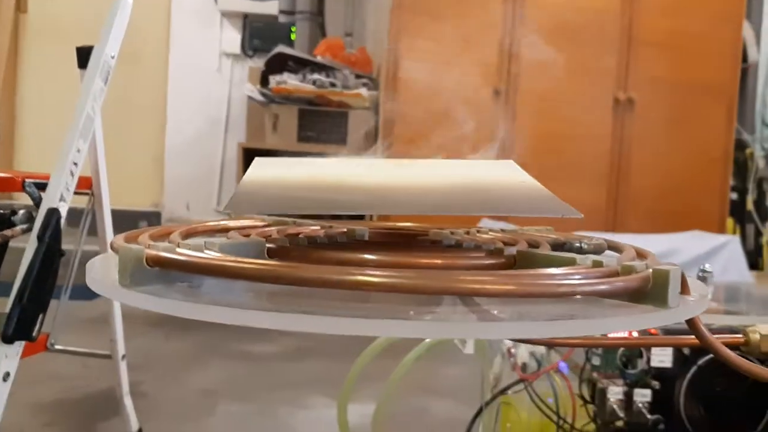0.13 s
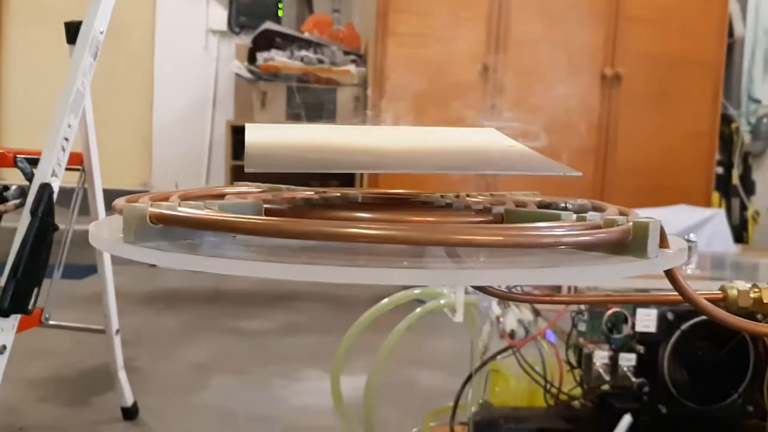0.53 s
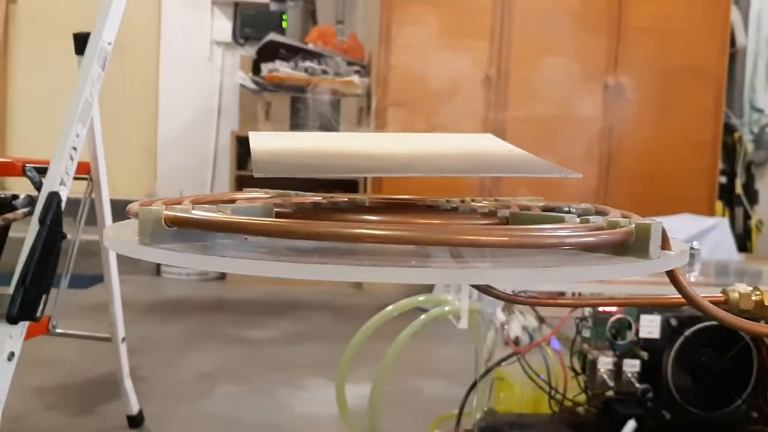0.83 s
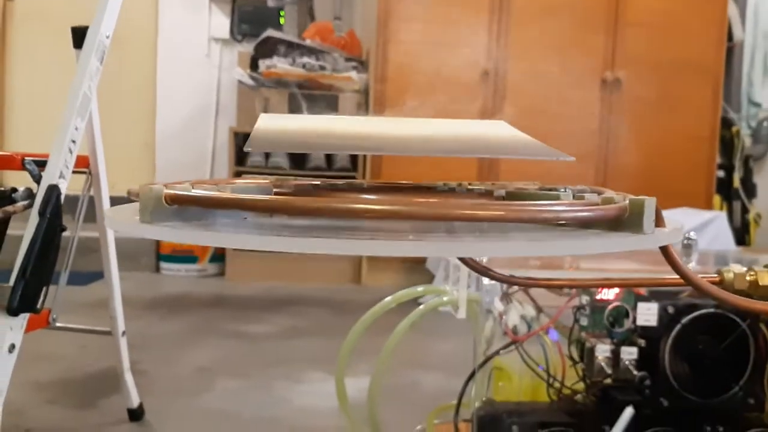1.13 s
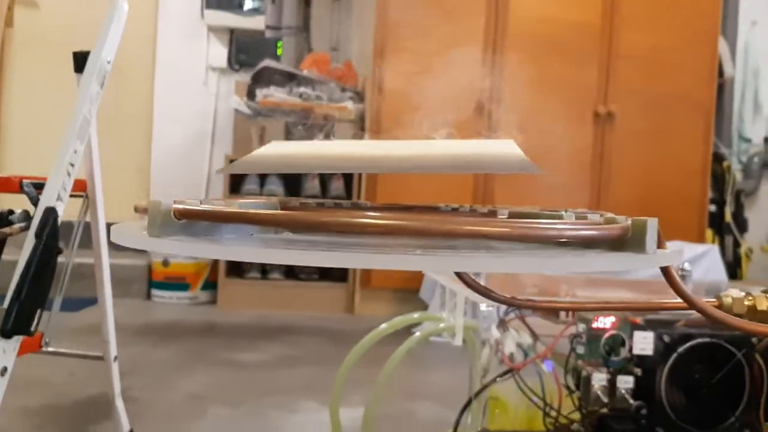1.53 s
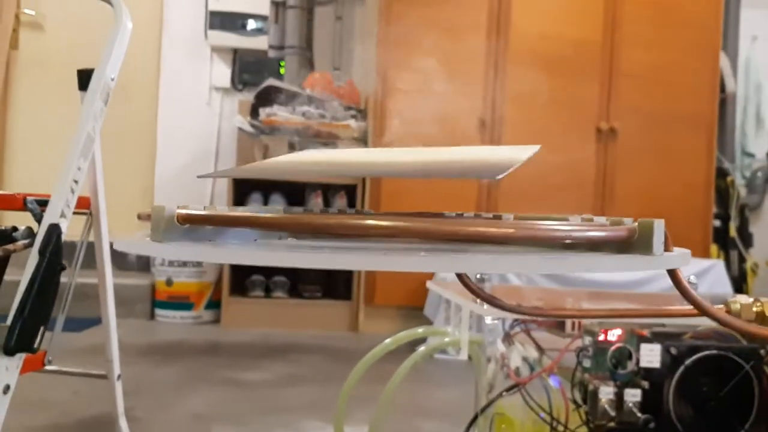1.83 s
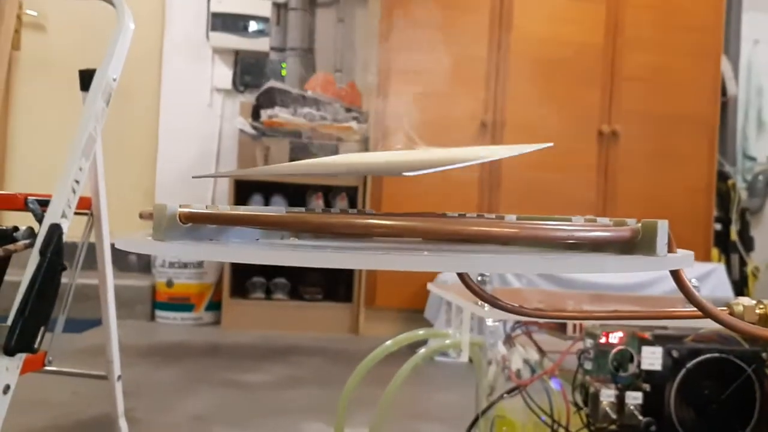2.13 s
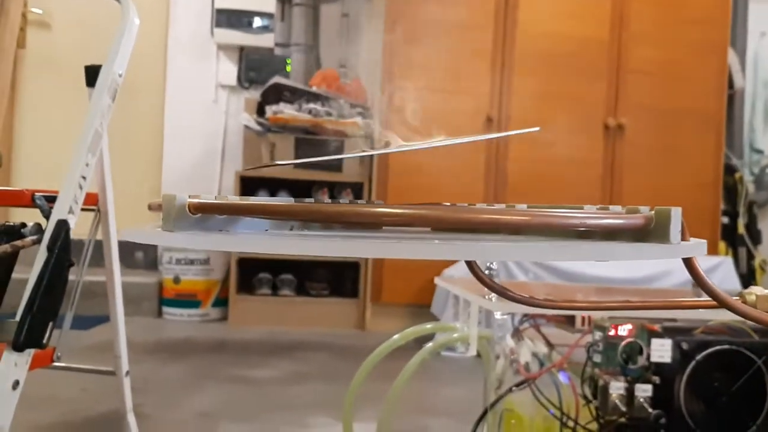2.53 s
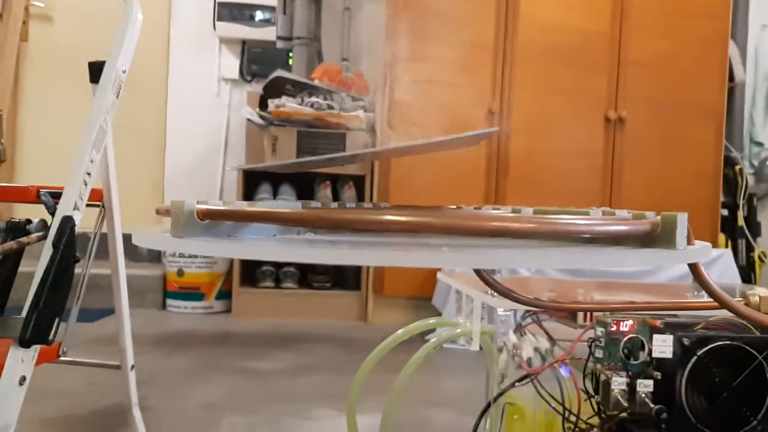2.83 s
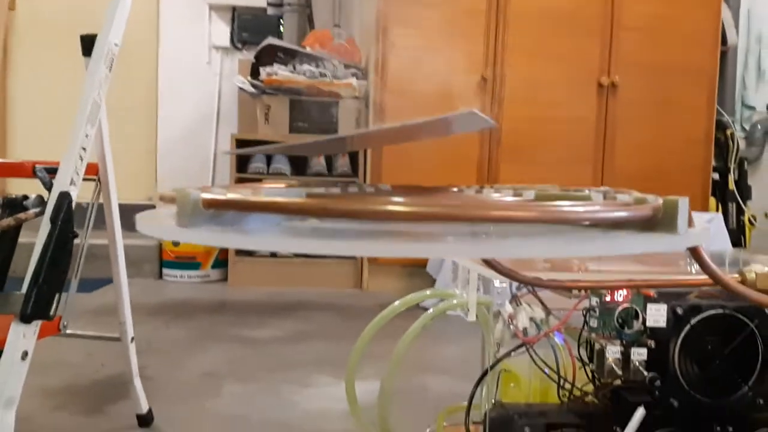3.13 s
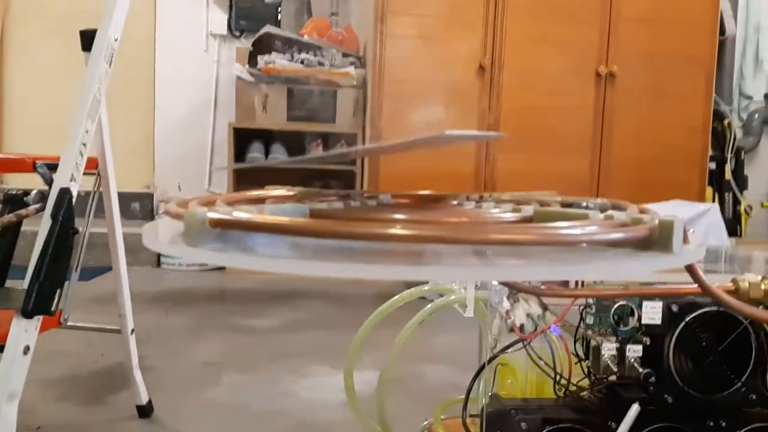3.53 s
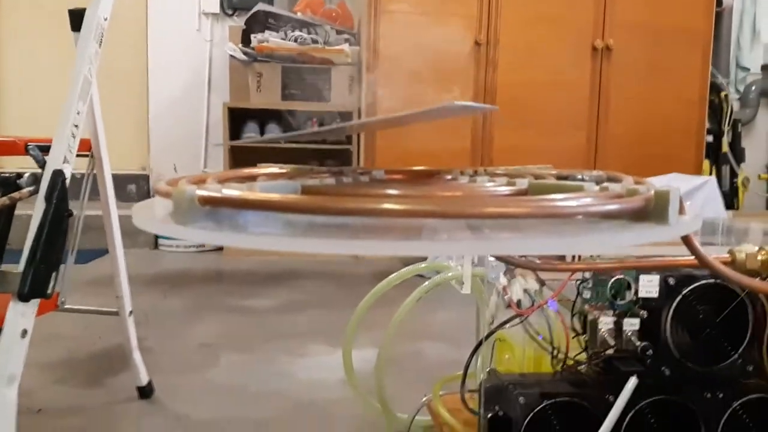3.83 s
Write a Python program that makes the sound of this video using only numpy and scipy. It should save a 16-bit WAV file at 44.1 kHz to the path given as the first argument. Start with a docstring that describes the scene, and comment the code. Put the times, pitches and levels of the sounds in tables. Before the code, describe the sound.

Steady rushing air from equipment fans, strongest in the upper mids with little deep bass, over a softly fluttering hum and faint wavering whine; close handheld phone microphones in a workshop, no beginning or end.

```python
"""Cooling fans of a power supply run steadily in a workshop, heard from about a metre by a handheld phone.
Throughout, air rushes through grilles and fins as shaped noise and stays nearly even; housing and room ring
as narrow noise bands, a hum that flutters irregularly in level, as noise does; faint blade and motor tones
are wavering sines. The two microphone ports hear the treble late and unlike."""
import sys
import numpy as np
from scipy import signal
from scipy.fft import rfft, irfft
from scipy.io import wavfile
from scipy.ndimage import uniform_filter1d

SR = 44100
rng = np.random.default_rng(int(sys.argv[2]) if len(sys.argv) > 2 else 0)


def master_out(mix):
    """Clip the mix to full scale and print it as 16-bit PCM to the path in sys.argv[1]."""
    frames = np.transpose(np.atleast_2d(mix))
    ceiling = np.clip(frames, -1, 1)
    pcm = np.round(ceiling * 32767).astype(np.int16)
    wavfile.write(sys.argv[1], SR, pcm)


N = 175959  # length [samples]

# phase by which the left port lags the right, negative where it leads: (frequency [Hz], lag [rad])
PORT_LAG = [(500, -1), (1150, -0.1), (1650, 2.), (2000, 1.5), (2300, 2.5), (2900, 3.5), (4000, 5),
            (4200, 4.5), (4450, 5), (4700, 4.), (5000, 6), (6200, 6), (7600, 9.5), (8900, 11.5),
            (9700, 14.5), (10600, 15.5), (15000, 23)]
# left minus right level of rush and rings: (frequency [Hz], difference [dB])
PORT_LEAN = [(450, 0.7), (740, 0.8), (1220, 1.5), (2010, 3), (3330, 2.5), (4600, 0.5), (6500, 1.1),
             (9080, 1), (12000, 2), (15000, 0)]


def gain_of(db):
    """Decibels to amplitude gain."""
    return 10 ** (np.asarray(db) / 20)


def evened(x):
    """Scales to rms 1."""
    return x / np.sqrt(np.mean(abs(x) ** 2) + 1e-20)


def read(points, hz):
    """Reads a table of (frequency, value) on a log-frequency axis."""
    f, value = np.transpose(points)
    return np.interp(np.log(hz + 1), np.log(f + 1), value)


def wander(t, top_hz, count=24):
    """Random wavering of rms 1: sines from 2.5 Hz to top_hz, the slower ones stronger."""
    rates = np.geomspace(2.5, top_hz, count)
    return evened(sum(np.sin(2 * np.pi * (f * t + rng.random())) / np.sqrt(f) for f in rates))


def level_flutter(t):
    """Irregular chance level flutter [dB] at times t: three rows for the rings, then three for the rush."""
    # points about every 0.2 s: (time [s], lower hum [dB], upper hum [dB], other rings [dB],
    #  body of the rush [dB], low treble [dB], high treble [dB])
    flutter_points = [(0.0, 3, -2, -2, 0.9, -0.5, -0.5), (0.2, -6.5, -2.5, 0.5, -0.5, 0.5, -0.9),
                      (0.4, 1.5, 0, -1.5, -0.4, 0.5, -0.7), (0.6, -1, -0.3, 2, 0.5, -1, -0.3),
                      (0.8, 2, 1.5, -1.3, 0, 2, -0.8), (1.0, -0.4, 4, -0.3, 0.3, 0, -0.2),
                      (1.2, -2.5, -1, 3, 0.5, -0.5, -0.5), (1.4, -1.2, 3, -2.5, 0.5, -0.2, -0.2),
                      (1.6, -3, -2.5, 2, -0.0, -0.1, -0.5), (1.8, 4, -5, -2, 1, 0, 0.0),
                      (2.0, 5.5, -4.5, 1.2, 0.3, 0.8, 0), (2.2, -1.7, -2, -0.0, 0.5, -1, 0.4),
                      (2.4, 1, -0.3, 0.5, 0.6, 0, 0.5), (2.6, -2.5, 1, 0, -0.0, 0.0, 1),
                      (2.8, 1.5, 5.5, 1.7, 0.5, -0.2, 0.3), (3.0, -1.1, -1.3, -0.2, -0.1, 0.5, 1),
                      (3.2, -0.7, 4.5, 0.4, 0.5, -1.5, 0), (3.4, 2.5, -3.5, 1.5, 0, -1.5, -0.2),
                      (3.6, -0.5, -2, -0.4, 0.6, -1, 0.2), (3.8, -0.6, -1, 0, 0.5, 1.3, 0.5),
                      (3.99, -2, 3, -1.6, -0.5, -1, 0.6)]
    times, *columns = np.transpose(flutter_points)
    return np.array([np.interp(t, times, db) for db in columns])


def rush():
    """Turbulent air: random short-time spectra with flutter and patches, heard by two ports."""
    # spectrum shape at the left port, overall level set at the end: (frequency [Hz], relative density [dB])
    air_shape = [(20, -88), (70, -92), (110, -82), (160, -71), (230, -62.5), (330, -58.5), (450, -59),
                 (900, -56), (1060, -58.5), (1300, -59.5), (1700, -56), (2020, -54), (2350, -59),
                 (2620, -53.5), (2850, -53), (3000, -50.5), (3500, -53.5), (4000, -54.5), (4200, -55),
                 (4500, -60), (4800, -59.5), (5100, -60), (5400, -63), (5800, -65.5), (6300, -67),
                 (7500, -75), (9600, -72.5), (11000, -76), (12500, -80), (15700, -84.5)]
    # left-right likeness above the mono range: (frequency [Hz], likeness [0-1])
    likeness = [(500, 0.96), (850, 0.97), (1200, 0.55), (1500, 0.57), (1850, 0.8), (2500, 0), (2900, 0.72),
                (3300, 0.68), (3600, 0.63), (3950, 0.77), (4150, 0.4), (4600, 0.4), (5100, 0.14), (6500, 0),
                (8000, 0.28), (9300, 0.4), (10200, 0), (15000, 0)]
    # centres of body, low treble and high treble, which flutter separately: [Hz]
    band_centres = [3800, 5500, 9000]
    rush_db = -19.5  # rms over both ports
    shared_db, patch_db, fine_db = 0.05, 0.98, 1.5  # rms of shared flutter, broad patches, small patches
    mono_hz, mono_same = 260, 0.99  # below this the ports hear nearly the same
    size, hop = 2048, 512  # spectrum frame [samples]

    frames, hz = N // hop + 9, np.fft.rfftfreq(size, 1 / SR)
    a, b, c, d, broad, fine = rng.standard_normal((frames, size // 2 + 1, 6)).T
    left, other = a + 1j * b, c + 1j * d

    # patches: noise smoothed over frequency, then over time
    broad = evened(uniform_filter1d(uniform_filter1d(broad, size=24, axis=0), size=6, axis=1))
    fine = evened(uniform_filter1d(uniform_filter1d(fine, size=4, axis=0), size=3, axis=1))
    shared = wander(np.arange(frames) * hop / SR, 10.0)

    # the ports part gradually over the octave above mono_hz
    apart = np.clip(hz / mono_hz - 1, 0, 1)
    same = np.clip(read(likeness, hz), 0, 1)
    same = (mono_same + (same - mono_same) * apart)[:, None]
    right = same * left + np.sqrt(1 - same ** 2) * other
    lean = gain_of(-apart * read(PORT_LEAN, hz))
    turn = np.exp(1j * apart * read(PORT_LAG, hz))
    spectra = np.array([left, right * (lean * turn)[:, None]])

    # crossfade the flutter of the three bands over log frequency
    share = np.array([np.interp(np.log(hz + 1), np.log(band_centres), row) for row in np.eye(3)])
    band_db = share.T @ level_flutter((np.arange(frames) * hop - size) / SR)[3:]
    texture_db = patch_db * broad + fine_db * fine + shared_db * shared
    spectra *= gain_of(read(air_shape, hz)[:, None] + band_db + texture_db)
    air = signal.istft(spectra, nperseg=size, noverlap=size - hop)[1][:, size:N + size]
    return gain_of(rush_db) * evened(air)


def rings():
    """Turbulence ringing housing and room: noise in steep narrow bands, three groups with separate flutter."""
    # resonances before flutter and lean: (frequency [Hz], width [Hz], rms level [dB])
    resonances = [(291, 19, -47), (376, 10.5, -41), (398.2, 13, -36), (423.6, 19.3, -30),
                  (441.6, 17.3, -29), (460.4, 15, -32), (499.1, 16.6, -31), (559, 51, -35),
                  (627.6, 44, -37), (715.6, 7, -44.5), (805, 11, -42.5), (854, 57, -38), (966, 14, -47),
                  (988, 13, -43), (1024, 19, -50.5)]
    # lower hum lies under, upper hum between, and other rings above these limits: [Hz]
    group_limits = [435, 478]
    same = 0.98  # left-right likeness

    hz, out = np.fft.rfftfreq(N, 1 / SR), np.zeros((2, N))
    lean = gain_of(np.outer([0.5, -0.5], read(PORT_LEAN, hz)))
    groups = np.searchsorted(group_limits, [f for f, width, db in resonances])
    for k, level_db in enumerate(level_flutter(np.arange(N) / SR)[:3]):
        power = np.zeros(len(hz))
        for group, (f, width, db) in zip(groups, resonances):
            if group == k:
                power += gain_of(2 * db) / width / (1 + (2 * (hz - f) / width) ** 2) ** 2
        power *= 2 * SR / np.pi  # gives each band its rms level
        a, b = rng.standard_normal((N, 2)).T
        pair = np.array([a, same * a + np.sqrt(1 - same ** 2) * b])
        ringing = irfft(rfft(pair) * np.sqrt(power) * lean, N)
        out += ringing * gain_of(level_db)
    return out


def tones():
    """Blade and motor tones: sines that waver a little in pitch and level, with a different phase at each port."""
    # (frequency [Hz], rms level before waver and lean [dB], left minus right [dB], rms pitch waver [Hz])
    tone_list = [(762, -36, 0.5, 2.9), (880.4, -40, 4, 3), (1159, -47, 2, 2.7), (1535, -48, 6, 4.3)]
    waver_db, waver_hz = 2.5, 10.0  # rms waver of tone level, fastest rate of both wavers

    t, out = np.arange(N) / SR, np.zeros((2, N))
    coarse = t[::256]
    for hz, db, lean_db, pitch_hz in tone_list:
        pitch = np.interp(t, coarse, wander(coarse, waver_hz))
        level = np.interp(t, coarse, wander(coarse, waver_hz))
        turns = np.cumsum(hz + pitch_hz * pitch) / SR + rng.random()
        lag = np.array([[read(PORT_LAG, hz)], [0]])
        side = gain_of([[lean_db / 2], [-lean_db / 2]])
        peak = np.sqrt(2) * gain_of(db + waver_db * level)
        out += side * peak * np.sin(2 * np.pi * turns - lag)
    return out


def scene():
    """All fan sounds at the two ports."""
    return rush() + rings() + tones()


def record(dry):
    """The recorder's band limit: a steep linear-phase low-pass at 15715 Hz."""
    low_pass = signal.firwin(1023, 15715, window=("kaiser", 9), fs=SR)
    return signal.oaconvolve(dry, low_pass[None], "same")


dry = scene()
out = record(dry)
master_out(out)
```